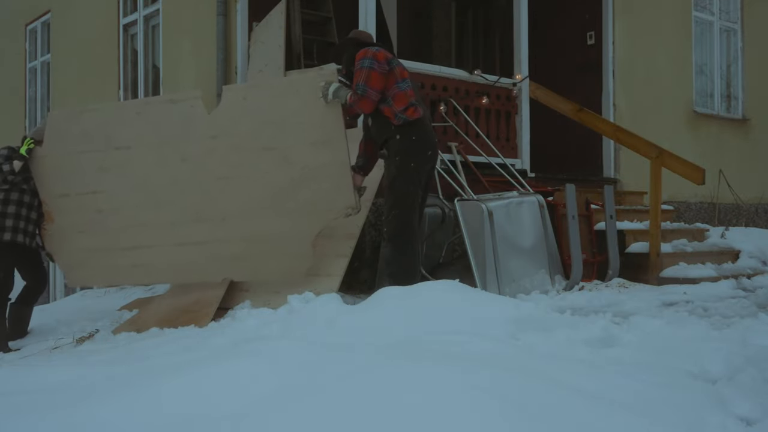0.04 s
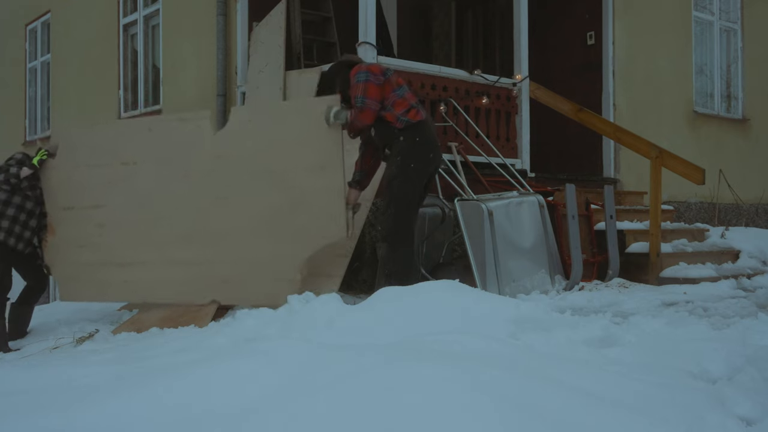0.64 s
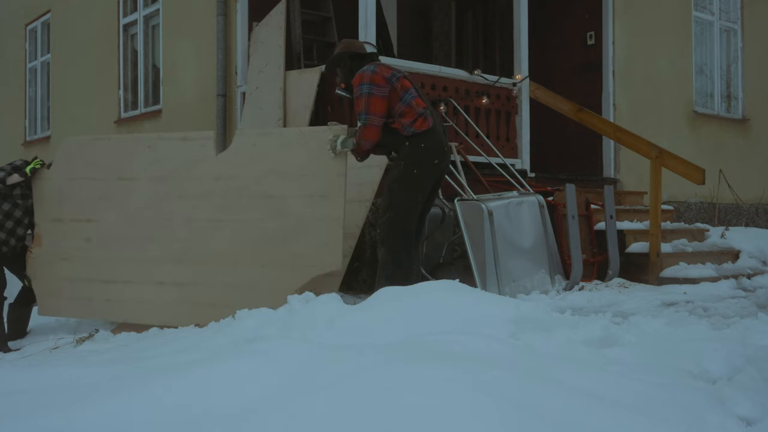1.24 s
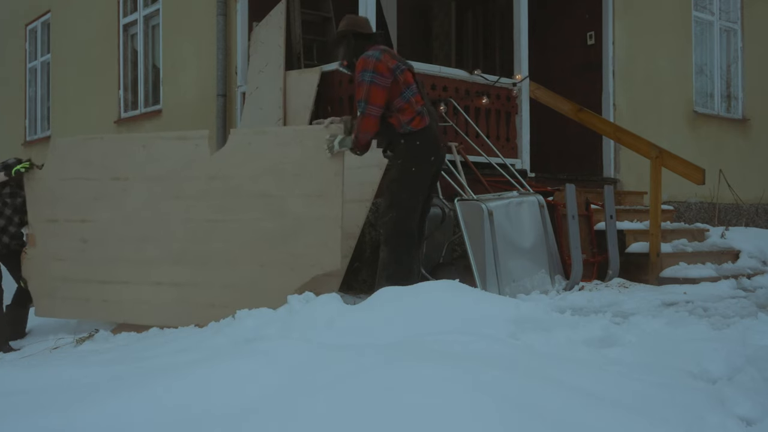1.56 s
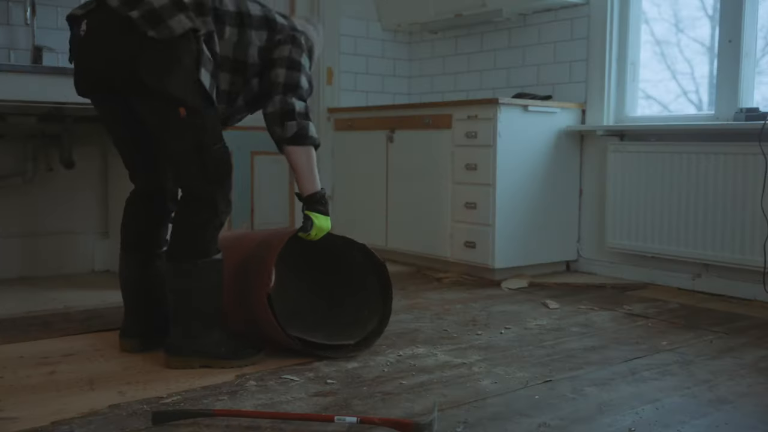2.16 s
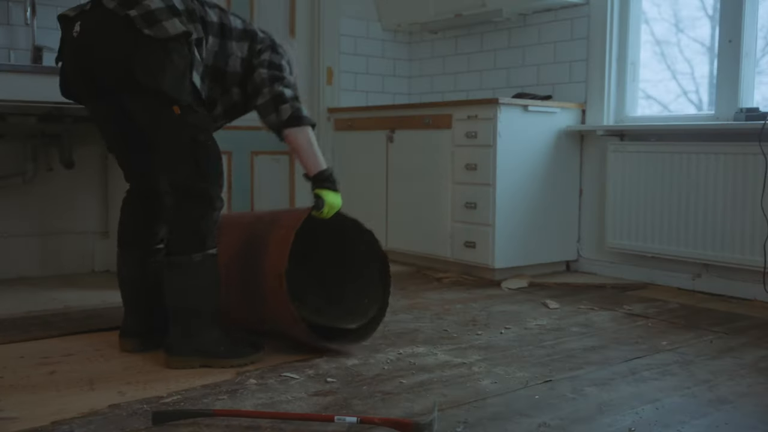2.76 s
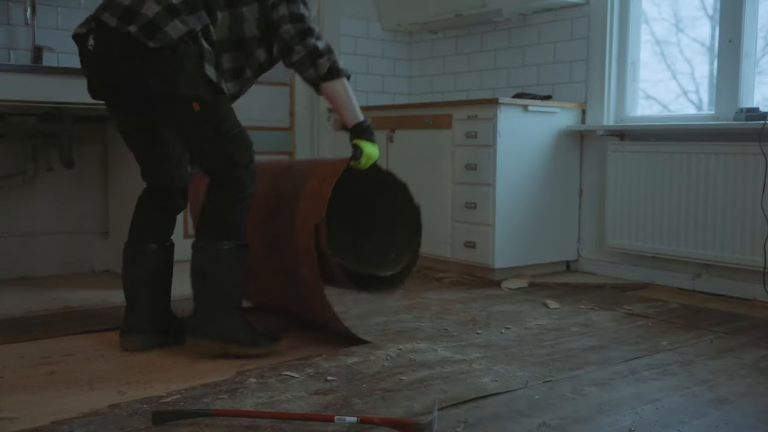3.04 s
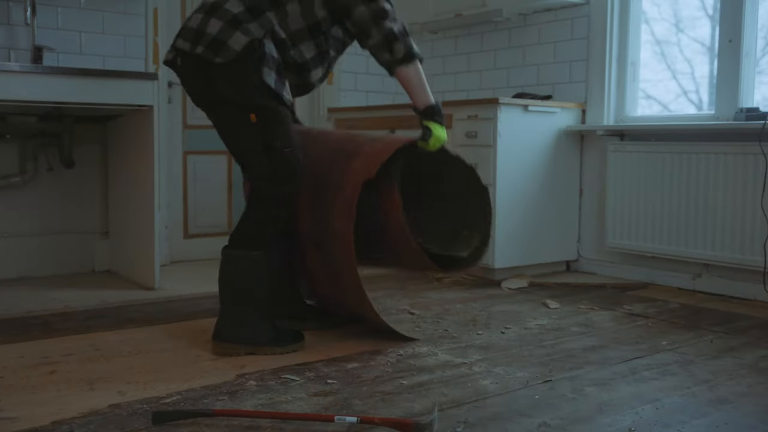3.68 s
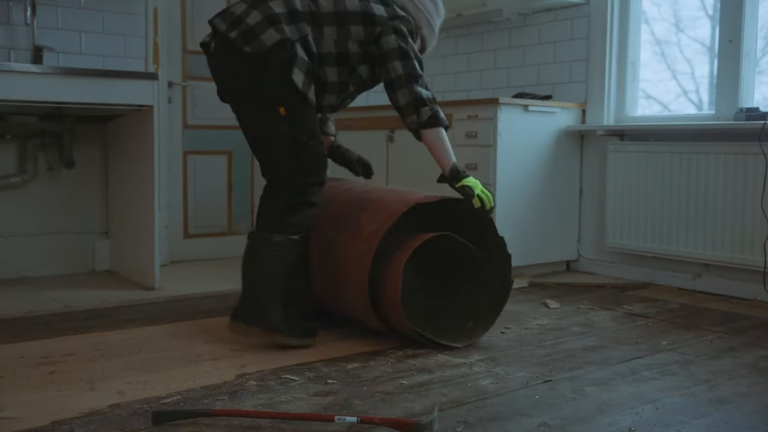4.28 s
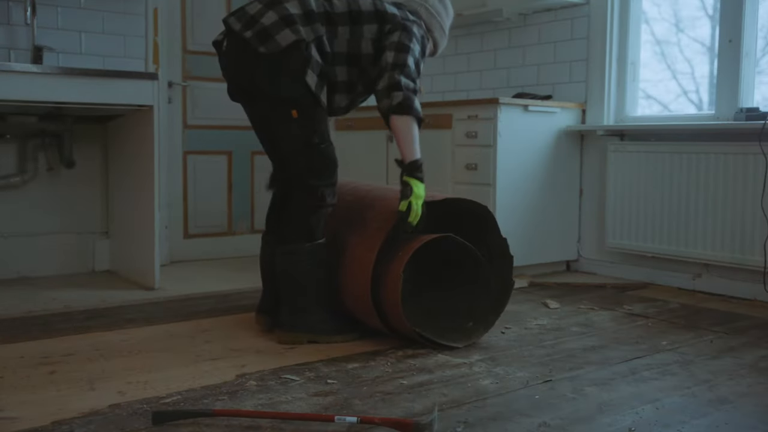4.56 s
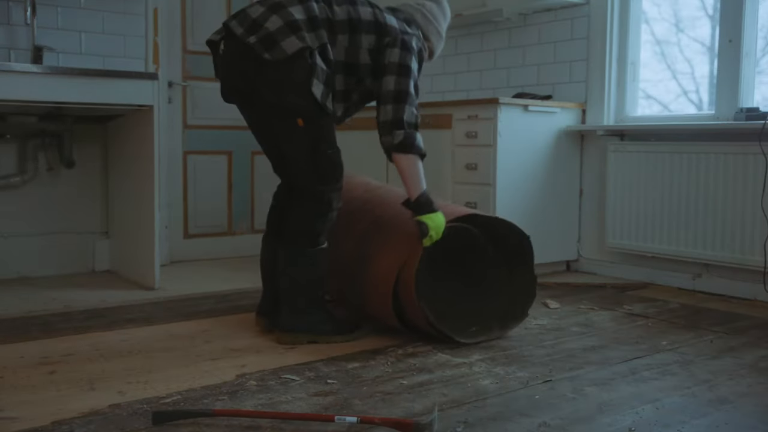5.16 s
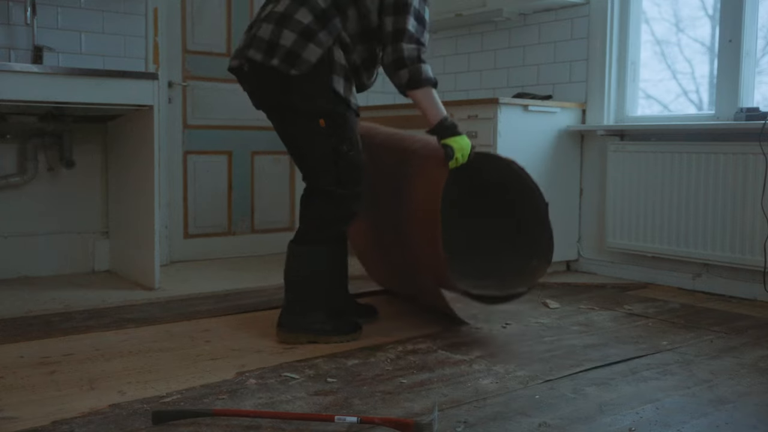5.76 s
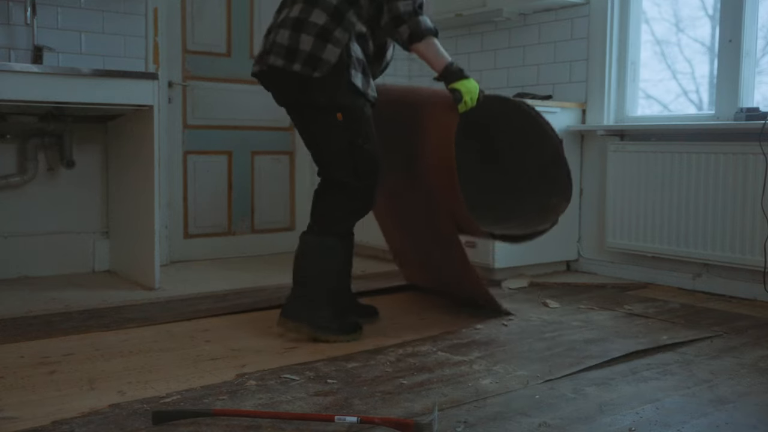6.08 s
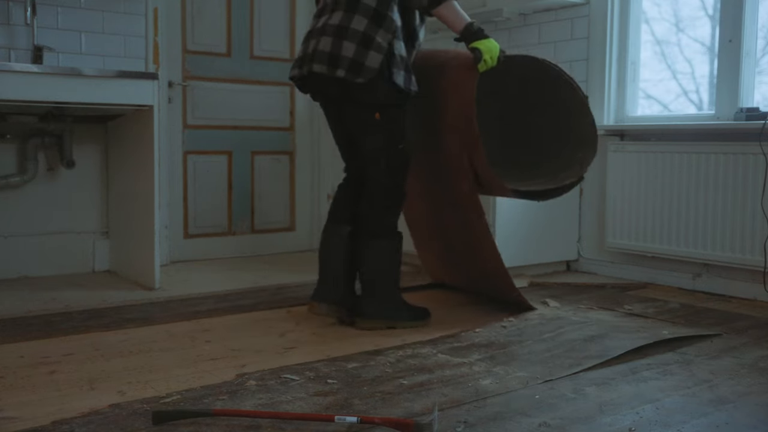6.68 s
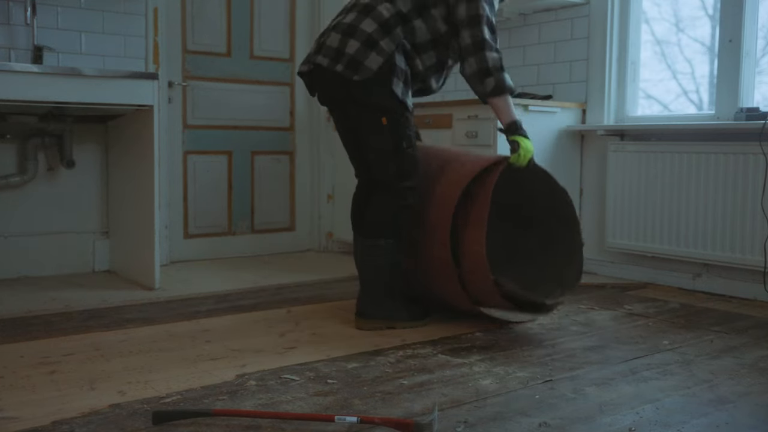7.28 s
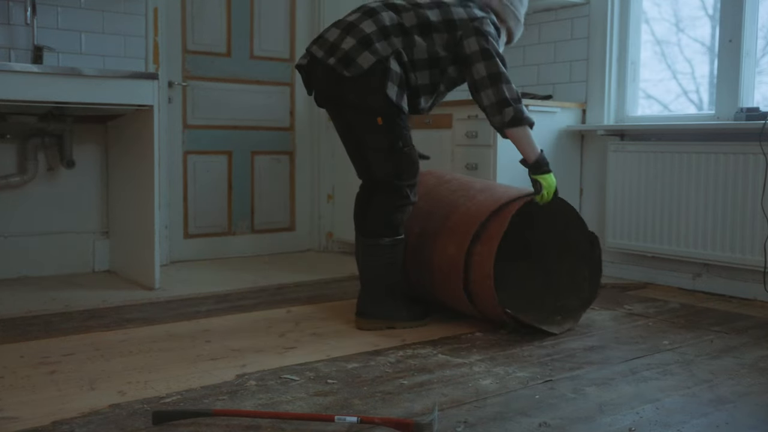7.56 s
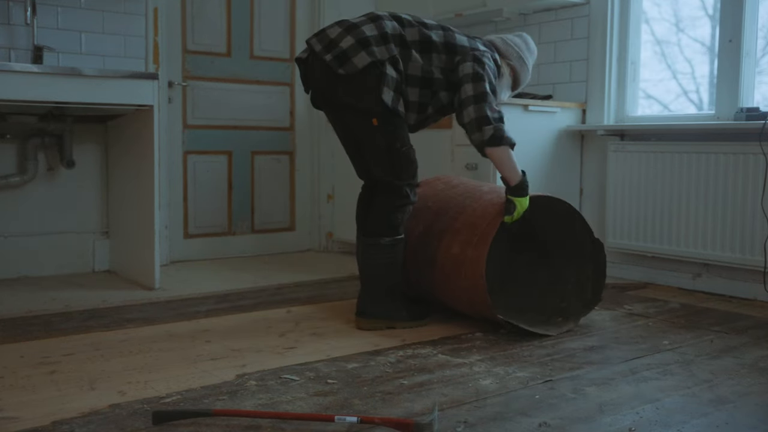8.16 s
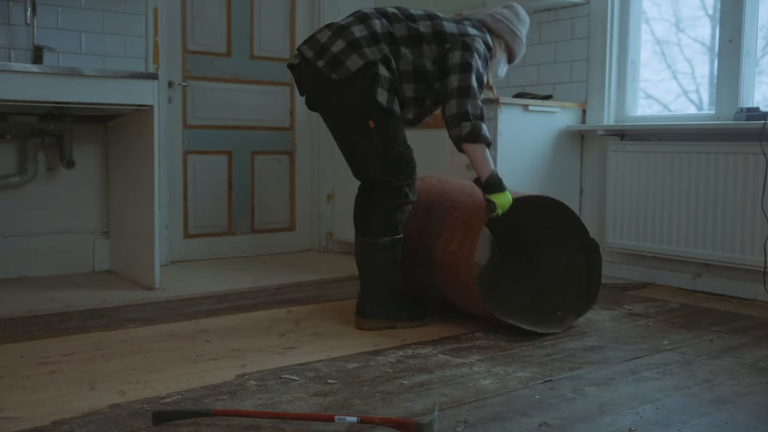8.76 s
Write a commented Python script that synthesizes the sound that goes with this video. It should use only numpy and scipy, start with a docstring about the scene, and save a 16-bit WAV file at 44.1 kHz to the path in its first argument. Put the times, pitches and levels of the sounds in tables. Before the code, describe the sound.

Old linoleum tears away from a wooden floor twice, the second pull longer, with snapping glue and a hollow drumming from the sheet. Quieter rubs, slaps and boot knocks surround the pulls, and the microphones stand well back in a bare, reverberant room. Before this comes a brief outdoor opening: a plywood panel scrapes and rumbles through crusted snow, with faint drips and crunching steps.

```python
"""A snowy yard, then a bare kitchen, both in stereo. Outside, meltwater drips and snow crunches
underfoot as two workers slide a big plywood sheet over the crust: its edge rasps, the panel rumbles.
Inside, old linoleum is ripped off the floorboards in two long pulls: its glue snaps and the sheet
drums. Between the pulls the stiff roll rubs on itself and slaps the floor, and boots shift on the
boards. The microphones stand far enough off to hear more of the walls than of the direct sound."""
import sys
import numpy as np
from scipy import signal
from scipy.fft import rfft, irfft, next_fast_len
from scipy.io import wavfile
from scipy.ndimage import map_coordinates

SR = 44100
rng = np.random.default_rng(int(sys.argv[2]) if len(sys.argv) > 2 else 0)


def log_audio(samples):
    """Write samples as a 16-bit WAV file to the path given in sys.argv[1]."""
    # one column per channel
    frames = np.atleast_2d(samples).T
    # limit to full scale, then quantise
    limited = np.clip(frames, -1, 1)
    pcm = np.round(limited * 32767).astype(np.int16)
    wavfile.write(sys.argv[1], SR, pcm)


N = 389403


def amp(db):
    """Decibels to gain."""
    return 10 ** (np.asarray(db) / 20)


def unit(x):
    """Scale to rms 1."""
    return x / np.sqrt(np.mean(x ** 2) + 1e-20)


def along(points, hz):
    """Read (freq_hz, value) points on a log frequency axis."""
    freqs, values = np.transpose(points)
    return np.interp(np.log(hz + 1), np.log(freqs + 1), values)


def add(track, start_s, sound):
    """Mix a sound into a track."""
    part = track[..., max(round(start_s * SR), 0):][..., :sound.shape[-1]]
    part += sound[..., :part.shape[-1]]


def wobble(rate):
    """A smooth random curve with rate knots a second."""
    knots = rng.standard_normal(int(N * rate / SR) + 4)
    return map_coordinates(knots, [np.arange(N) * rate / SR])


def filtered(x, response):
    """x times a response of frequency."""
    n = x.shape[-1]
    size = next_fast_len(n + 8192)
    return irfft(rfft(x, size) * response(np.fft.rfftfreq(size, 1 / SR)), size)[..., :n]


def band(x, centre_hz, width):
    """One band of x, rms 1; width is in log frequency."""
    return unit(filtered(x, lambda hz: 1 / (1 + (np.log((hz + 1) / centre_hz) / width) ** 2)))


def coloured(x, spectrum, modes=(), size=8192):
    """x through a causal body of unit energy: a broad spectrum with resonances on top."""
    hz = np.fft.rfftfreq(size, 1 / SR)
    peaks = 1 + sum(amp(db) / (1 + (2 * (hz - centre) / width) ** 2) for centre, width, db in modes)
    gain = amp(along(spectrum, hz)) * peaks
    cepstrum = irfft(np.log(np.maximum(gain, 1e-6)))
    cepstrum[1:size // 2] *= 2  # minimum phase: the ring follows the blow
    cepstrum[size // 2 + 1:] = 0
    ring = irfft(np.exp(rfft(cepstrum)))
    ring = np.reshape(ring / np.linalg.norm(ring), (1,) * (x.ndim - 1) + (-1,))
    return signal.oaconvolve(x, ring, axes=-1)[..., :x.shape[-1]]


def focused(x, centre_hz, boost_db, width, wander):
    """x through a resonance that wanders around a moving centre, rms 1."""
    hz, t, frames = signal.stft(x, SR, nperseg=1024)
    pitch = np.interp(t * SR, np.arange(N), centre_hz * np.exp(wander * wobble(35)))
    bell = np.exp(-(np.log((hz[:, None] + 1) / pitch) / width) ** 2)
    return unit(signal.istft(frames * amp(boost_db * bell), SR, nperseg=1024)[1][:, :N])


def widen(pair, likeness):
    """Two unrelated signals become left and right with a given likeness."""
    def weights(hz):
        angle = np.arccos(np.clip(along(likeness, hz), -.999, .999)) / 2
        return np.array([np.cos(angle), np.sin(angle)])
    mid, side = filtered(pair, weights)
    return np.array([mid + side, mid - side])


def grains(rate, scatter_db, channels=1):
    """Tiny fractures at random moments and of random sizes, rate a second, rms 1."""
    hits = rng.random(N) < rate / SR
    sizes = amp(scatter_db * np.clip(rng.standard_normal(N), -2, 2))
    return unit(hits * sizes * rng.standard_normal((channels, N)))


def burst(t60, channels=1):
    """A pitchless puff of even noise that fades 15 dB every t60 seconds, so it dies in about four times t60."""
    fade = amp(-60 * np.arange(SR // 4) / SR / t60)
    phases = np.angle(rfft(rng.standard_normal((channels, len(fade))) * fade))
    even_noise = irfft(np.exp(1j * phases), len(fade))
    return even_noise * np.linalg.norm(fade) * fade ** .25


def swell(peak_s, rise_s, fall_s, hold_s=0):
    """Gain of one stroke: it climbs 20 dB per rise_s, holds, and drops 20 dB per fall_s."""
    t = np.arange(N) / SR - peak_s
    decades_down = np.maximum(-t, 0) / rise_s + np.maximum(t - hold_s, 0) / fall_s
    return amp(-20 * np.minimum(decades_down, 10))


def strokes(rows):
    """Overlapping strokes add in power; one gain curve per layer."""
    gains = (np.outer(amp(layers_db), swell(peak_s, rise_s, fall_s))
             for peak_s, *layers_db, rise_s, fall_s in rows)
    return np.sqrt(sum(gain ** 2 for gain in gains))


def indoors(from_s=1.91, fade_s=.05):
    """0 in the yard, 1 in the kitchen, with a brief fade between."""
    return np.clip((np.arange(N) / SR - from_s) / fade_s, 0, 1)


# How alike the two microphones hear each place: freq_hz, likeness (0-1)
YARD_LIKENESS = [(100, 1), (400, 0.99), (1000, 0.71), (2400, 0.6), (6000, 0.2), (15000, 0)]
KITCHEN_LIKENESS = [(100, 1), (240, 1), (480, 0.87), (950, 0.4), (1900, 0.22), (3800, 0.082), (15000, 0.16)]
# Quiet air all around the microphones: freq_hz, level_db
YARD_AIR = [(25, -1), (150, -5), (700, -3), (2000, -19), (3000, -2), (4300, -12.5), (6300, 0),
            (9000, -12.5), (16000, -12)]
KITCHEN_AIR = [(25, 2.5), (100, -22), (300, -1.5), (560, -5), (680, 4.5), (850, -1.5), (3000, -2),
               (4600, -10.5), (6500, -5), (8000, -21), (16000, -29)]

def air():
    """Faint, wavering outdoor air gives way to the still room."""
    yard = widen(coloured(rng.standard_normal((2, N)), YARD_AIR), YARD_LIKENESS[2:])
    room = widen(coloured(rng.standard_normal((2, N)), KITCHEN_AIR), KITCHEN_LIKENESS)
    return amp(-67 + .4 * wobble(7.2)) * (1 - indoors()) * yard + amp(-65.5) * indoors() * room


# Decay of the bare kitchen: freq_hz, t60_s
KITCHEN_DECAY = [(60, 0.63), (250, 0.39), (700, 0.56), (2500, 0.8), (5500, 0.62), (8000, 0.51),
                 (15000, 0.24)]

def room_tail():
    """The answer of bare walls, tiles and boards; the highest treble dies first."""
    hz, t, frames = signal.stft(rng.standard_normal((2, SR)), SR, nperseg=256)
    t60 = along(KITCHEN_DECAY, hz)[:, None]
    onset = 1 - np.exp(-t / 0.00077)
    frames = frames * amp(-60 * t / t60) / np.sqrt(t60) * onset
    tail = widen(signal.istft(frames, SR, nperseg=256)[1], KITCHEN_LIKENESS)
    return tail / np.linalg.norm(tail, axis=1, keepdims=True)


def kitchen(x, patterns=8, changes_per_s=20):
    """The roll keeps moving, so one pattern of reflections fades into the next."""
    position = np.arange(N) / SR * changes_per_s
    room = np.zeros((2, N))
    for k in range(patterns):
        share = np.sin(np.pi / 2 * np.minimum((position - k) % patterns, 2))
        room += signal.oaconvolve(x * share, room_tail(), axes=1)[:, :N]
    direct = np.array([np.roll(x[0], 4), x[0]])  # the right microphone is a little nearer
    return amp(-3.5) * direct + amp(0.5) * room


# In the yard, meltwater drips, then a few longer crunches of snow underfoot and one faint knock:
# start_s, level_db, pitch_hz, noise_share (0-1), t60_s
DRIPS_AND_CRUNCHES = [(.038, -50, 7070, .7, .06), (.125, -50, 2120, 1, 0.045), (.202, -53.5, 1792, .1, .1),
                      (.260, -43.5, 4640, 0.9, 0.072), (.329, -46.5, 3900, 1, 0.11),
                      (1.222, -49.5, 5360, 0.87, 0.19), (1.371, -52.5, 5120, 0.85, 0.24),
                      (1.397, -48.5, 5580, 0.8, .05), (1.514, -49.5, 1016, 0.28, 0.089),
                      (1.59, -61, 717, .8, 0.28), (1.598, -53, 6860, 0.52, 0.066),
                      (1.665, -53.5, 6540, 1, 0.35), (1.728, -53, 2490, 0.7, 0.1)]

def drips_and_crunches():
    """Drips, crunches and a knock: each is a dying blend of noise and a ring at one pitch."""
    sounds, t = np.zeros((2, N)), np.arange(SR // 4) / SR
    for start_s, level_db, pitch_hz, noise_share, t60 in DRIPS_AND_CRUNCHES:
        noise = band(rng.standard_normal((2, len(t))), pitch_hz, width=0.19)
        ring = np.sqrt(2) * np.sin(2 * np.pi * (pitch_hz * t + rng.random((2, 1))))
        envelope = amp(level_db - 60 * t / t60) * (1 - np.exp(-t / 0.00055))
        blend = np.sqrt(noise_share) * noise + np.sqrt(1 - noise_share) * ring
        add(sounds, start_s, envelope * blend)
    return amp(2) * widen(sounds, YARD_LIKENESS)


# Boots scuffing the kitchen floor: peak_s, level_db, pitch_hz, half_length_s
BOOT_SCUFFS = [(3.859, -40, 1990, 0.057), (4.678, -55.5, 2600, 0.021), (7.414, -41.5, 3000, 0.062),
               (7.636, -47, 650, 0.031), (8.239, -39.5, 447, 0.035)]

def scuffs():
    """Boots scuff the boards: short swells of gritty friction around one pitch."""
    friction, t = np.zeros(N), np.arange(N) / SR
    for peak_s, level_db, pitch_hz, half_length_s in BOOT_SCUFFS:
        grit = band(grains(rate=3000, scatter_db=4)[0], pitch_hz, width=0.28)
        friction += grit * amp(level_db) * np.exp(-((t - peak_s) / half_length_s) ** 2)
    return friction


# Boots and the roll landing on the floorboards: start_s, level_db, pitch_hz, thud_offset_db
FLOOR_KNOCKS = [(1.907, -43.5, 153, -10), (2.041, -42.5, 318, -20), (2.098, -48.5, 193, -11),
                (3.663, -40, 305, -35), (3.719, -39.5, 510, -7), (3.989, -32, 290, -8),
                (4.029, -31, 508, -7.5), (4.079, -42, 176, -23), (4.54, -46, 318, -6),
                (4.674, -56, 348, -20), (4.92, -52.5, 477, -27), (5.109, -46.5, 452, -25),
                (6.039, -17.5, 290, -32), (6.94, -42.5, 455, -13), (7.104, -52, 305, -5),
                (8.746, -45.5, 530, 1), (8.759, -36, 420, -25)]

def floor_knocks():
    """Soft blows on the floorboards: a short wooden knock and a thud of the joists."""
    # freq_hz, level_db
    board = [(60, -20.5), (170, -6.5), (400, -4.5), (700, -8), (2500, -18.5), (12000, -73)]
    joists = [(25, -13), (45, -1.5), (90, -3), (170, -13), (400, -22), (2500, -100)]
    knocks, thuds = np.zeros((2, 1, N))
    t = np.arange(SR // 4) / SR
    for start_s, level_db, pitch_hz, thud_offset_db in FLOOR_KNOCKS:
        envelope = amp(level_db - 1.5 - 60 * t / 0.09) * (1 - np.exp(-t / 0.0011))
        add(knocks, start_s, envelope * np.sin(2 * np.pi * pitch_hz * t))
        add(knocks, start_s, amp(level_db) * coloured(burst(t60=0.059), board))
        add(thuds, start_s, amp(level_db + thud_offset_db - 2.5) * burst(t60=0.11))
    return knocks + coloured(thuds, joists)


# Linoleum slapping and flicking in the kitchen: start_s, level_db, body_offset_db, landing_s
LINOLEUM_SLAPS = [(1.917, -32, -6.5, 0.0012), (2.6977, -32.5, -11, 0.0014), (3.9982, -31, 4, 0.0032),
                  (4.4781, -41, -30, 0.0014), (5.1228, -41, -0.5, 0.0006), (5.2697, -39, 6, 0.0024),
                  (6.0198, -23, -8.5, 0.002), (6.3354, -28, 11, 0.0011), (7.2452, -46.5, -20, 0.0013),
                  (7.519, -31, -4, 0.0025), (7.6876, -35.5, -8, 0.0016), (8.097, -42.5, -4, 0.00081)]
# Body of the loose sheet: freq_hz, level_db
LINOLEUM_BODY = [(25, -30), (60, -18.5), (125, -24), (165, -10.5), (220, -10), (300, -4), (600, -4.5),
                 (850, -1.5), (1400, -7.5), (2600, -44)]

def slaps():
    """The stiff sheet cracks or smacks down: a bright flick over a dull push."""
    flick_spectrum = [(150, -12), (700, -10.5), (1400, -8), (2700, 0.5), (4500, -4.5),
                      (6300, -2), (8000, -16), (11000, -21), (16000, -24.5)]
    flick, push = np.zeros((2, 1, N))
    t = np.arange(SR // 4) / SR
    for start_s, level_db, body_offset_db, landing_s in LINOLEUM_SLAPS:
        contact = 1 - np.exp(-t / landing_s)  # the sheet does not land all at once
        add(flick, start_s, amp(level_db + 5) * contact * burst(t60=0.067))
        add(push, start_s, amp(level_db + body_offset_db - 2) * contact * burst(t60=0.15))
    return coloured(flick, flick_spectrum) + coloured(push, LINOLEUM_BODY)


# The roll handled in the kitchen: peak_s, rub_db, hollow_db, rise_s, fall_s
ROLL_STROKES = [(2.63, -49.5, -54, .008, .3), (2.70, -30, -40, 0.05, 0.083), (3.61, -49.5, -65, .1, 1),
                (3.93, -46.5, -39.5, 0.39, 0.26), (4.02, -32.5, -35, 0.13, 0.096),
                (4.25, -55.5, -54.5, 0.5, .08), (4.53, -55.5, -55.5, 0.032, 0.58),
                (4.92, -60.5, -60, 0.13, 0.33), (5.13, -48, -50, .02, 0.69), (5.27, -43.5, -40.5, 0.2, .1),
                (7.33, -51, -55, 0.092, .15), (7.398, -38.5, -43.5, 0.034, 0.24),
                (7.465, -41, -45, .05, 0.26), (7.70, -40, -42, 0.06, 0.1), (7.92, -59, -55.5, .15, 0.045),
                (8.115, -45, -51, .02, .4), (8.24, -31, -32.5, 0.11, 0.14), (8.555, -48, -47, 0.19, 0.14)]
# Its rubbing faces and its hollow tube: freq_hz, level_db
ROLL_HISS = [(410, -28.5), (700, -6.5), (958, -17.5), (1250, -5.5), (1440, -4), (2460, -4), (3990, -10),
             (6150, -10.5), (7590, -19), (11200, -28.5), (15200, -27.5), (16000, -29)]
ROLL_TUBE = [(25, -22), (80, -19), (170, -13), (225, -17), (300, 0), (400, -6.5), (500, -2), (800, -3.5),
             (1200, -3.5), (2200, -47)]

def roll_rubbing():
    """Gritty turns of the roll slide over each other; the tube answers hollowly."""
    rub, hollow = strokes(ROLL_STROKES)
    catches = unit(amp(1.46 * wobble(45)))
    hiss = coloured(grains(rate=4000, scatter_db=1.5) * catches * rub, ROLL_HISS)
    body = coloured(grains(rate=1200, scatter_db=2.5) * catches * hollow, ROLL_TUBE)
    return amp(-0.5) * hiss + amp(-3) * body


# Plywood shoved across the open yard: peak_s, scrape_db, flex_db, ice_db, rise_s, fall_s
PLYWOOD_SHOVES = [(.41, -38.5, -37, -66, 0.026, 0.24), (.56, -41.5, -64, -43.5, 0.065, 0.12),
                  (.66, -37.5, -69, -60, 0.12, 0.28), (.721, -31.5, -36.5, -41, .01, 0.36),
                  (.81, -30, -29, -46, 0.083, 0.13), (1.0, -39.5, -42.5, -57.5, 0.17, 0.22),
                  (1.17, -41.5, -51, -71, 0.75, 0.071), (1.70, -69, -73.5, -60.5, 0.27, 1)]
# Its edge breaking the ice crust: start_s, level_db, snap_offset_db
CRUST_BREAKS = [(0.371, -33, -38), (0.396, -16.5, -39), (0.401, -19.5, -45), (0.406, -18, -49),
                (0.421, -20, -48.5), (0.431, -18, -53), (0.479, -23.5, -22), (0.549, -24.5, -9),
                (0.79, -19.5, -14.5), (0.829, -17, -20), (0.898, -35.5, -6)]
# The panel bumping the ground: start_s, level_db
GROUND_BUMPS = [(0.373, -37.5), (0.432, -25.5), (0.452, -28), (0.716, -37.5), (0.805, -27)]
# Scraped snow, rumbling panel and snapping ice crystals: freq_hz, level_db
SNOW_RASP = [(400, -46), (900, -22), (1300, -6.5), (1800, -5.5), (2500, -3.5), (4400, -8.5), (6300, -10.5),
             (8000, -23.5), (9800, -34), (12200, -21.5), (16000, -27)]
PANEL_RUMBLE = [(25, -19), (42, -1.5), (60, 0), (120, 0.5), (200, -6.5), (300, -13), (400, -10.5),
                (490, -6.5), (580, -16.5), (1000, -16), (2000, -56)]
ICE_SNAP = [(1500, -24), (3500, 2.5), (6300, 2.5), (9500, -18), (12000, 5), (16000, -4)]
# Ring of the plywood's edge: pitch_hz, width_hz, level_db
EDGE_RING = [(1200, 81, 2), (1760, 160, -2)]

def plywood(skim_hz=3000, dig_hz=1505):
    """The edge grinds through icy grains and sets the whole panel rumbling."""
    scrape, flex, ice = strokes(PLYWOOD_SHOVES)
    grit = grains(rate=4500, scatter_db=1, channels=2) * amp(0.48 * wobble(110.2))
    dig = flex / (flex + amp(-12) * scrape)
    rasp_hz = skim_hz + (dig_hz - skim_hz) * dig  # lower as the edge digs in and flexes the panel
    snow = coloured(grit, SNOW_RASP, EDGE_RING)
    rasp = scrape * focused(snow, rasp_hz, boost_db=6, width=0.11, wander=0.14)
    push = grains(rate=1500, scatter_db=1.5, channels=2) * flex * amp(1)
    snaps = ice * grains(rate=1300, scatter_db=1, channels=2)  # single ice crystals break
    cracks = np.zeros((2, N))
    for start_s, level_db, snap_offset_db in CRUST_BREAKS:
        add(cracks, start_s, amp(level_db - 9.5) * burst(t60=0.057, channels=2))
        add(snaps, start_s, amp(level_db + snap_offset_db + 9) * burst(t60=0.035, channels=2))
    for start_s, level_db in GROUND_BUMPS:
        add(push, start_s, amp(level_db - 1.5) * burst(t60=0.11, channels=2))
    crust = coloured(cracks, [(300, -71.5), (1200, 2.5), (2600, 6), (3300, 3),
                              (4300, -27), (6300, -5.5), (9000, -40), (16000, -40)])
    slide = rasp + coloured(push, PANEL_RUMBLE) + crust + coloured(snaps, ICE_SNAP)
    return widen(slide, YARD_LIKENESS) * amp([[.5], [-.5]])  # slightly to the left


# Pulls on the kitchen linoleum, the second ending in an extra tug:
# start_s, end_s, level_db, build_s, release_s, first_crackle_db, last_crackle_db
LINOLEUM_PULLS = [(2.695, 3.386, -23.5, .07, 0.2, -5, -8.5), (5.268, 6.265, -23, 0.29, 0.11, -8.5, -5),
                  (6.331, 6.601, -23, .02, 0.075, -5.5, -3.5)]

def pulling(bite_s=0.0063, slack_db=5, lengthen_s=0.15):
    """Each pull bites, builds and lets go; the glue's grip changes and the freed flap lengthens."""
    t = np.arange(N) / SR
    force, crackle, shortness = np.zeros((3, N))
    for start_s, end_s, level_db, build_s, release_s, first_db, last_db in LINOLEUM_PULLS:
        slack = np.clip(1 - (t - start_s) / build_s, 0, 1)
        envelope = swell(start_s, bite_s, release_s, hold_s=end_s - start_s)
        pull = amp(level_db - slack_db * slack) * envelope
        force += pull
        crackle += pull * amp(np.interp(t, [start_s, end_s], [first_db, last_db]))
        age_s = np.maximum(t - start_s, 0)
        shortness = np.where(t > start_s - bite_s, np.exp(-age_s / lengthen_s), shortness)
    return force, crackle, shortness


# Resonances of the lifted sheet and the floor: pitch_hz, width_hz, level_db
FLAP_RING = [(173, 23, -3.5), (318, 38, 1.5), (373, 54, -14.5), (487, 20, -9), (637.5, 41, 2.5)]
# Snapping glue and tearing backing fibres, down at the boards: freq_hz, level_db
GLUE_CRACKLE = [(450, -28), (800, -8.5), (1200, 0), (1700, -3.5), (2400, -7), (3300, -10), (4800, -17),
                (6400, -13.5), (7600, -29.5), (10000, -52), (16000, -62.5)]
FIBRE_FIZZ = [(4000, -37), (7500, -1), (11000, -3.5), (13000, -2.5), (15500, -1.5), (16200, 5.5)]

def peeling(short_hz=710, long_hz=465, short_cut_db=5.5):
    """Glue lets go in clumps of snaps that crackle and kick the lifted sheet; the fibres fizz."""
    force, crackle, shortness = pulling()
    clumps = unit(amp(3.2 * wobble(130) + 0.4 * wobble(25)))
    snaps = unit(clumps * grains(rate=1500, scatter_db=2.5))
    fibres = unit(np.sqrt(clumps) * grains(rate=6000, scatter_db=4.5))
    flap_hz = long_hz + (short_hz - long_hz) * shortness  # a short flap drums higher and softer
    sheet = coloured(snaps, LINOLEUM_BODY, FLAP_RING)
    flap = focused(sheet, flap_hz, boost_db=6, width=0.32, wander=0.058)
    drum = flap * force * amp(-short_cut_db * shortness)
    glue = coloured((amp(-5.5) * snaps + amp(-1) * fibres) * crackle, GLUE_CRACKLE)
    fizz = coloured(fibres * force, FIBRE_FIZZ)
    return amp(-2.5) * drum + glue + amp(-16) * fizz


def scene():
    """First the yard, then the kitchen."""
    yard = (plywood() + drips_and_crunches()) * (1 - indoors())
    floor_work = peeling() + roll_rubbing() + scuffs() + slaps() + floor_knocks()
    return yard + kitchen(floor_work) + air()


def record(dry, top_hz=15900):
    """The recorder keeps nothing above its band limit."""
    return filtered(dry, lambda hz: hz < top_hz)


dry = scene()
out = record(dry)
log_audio(out)
```